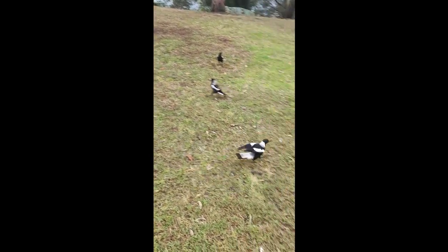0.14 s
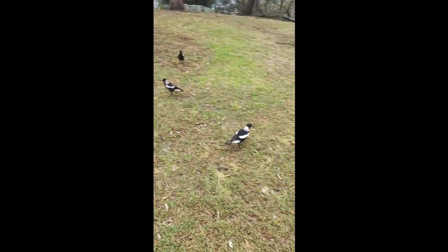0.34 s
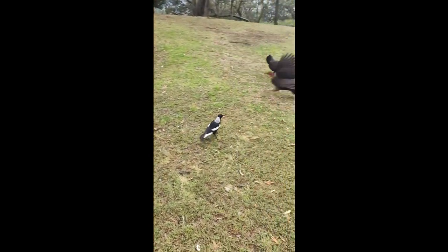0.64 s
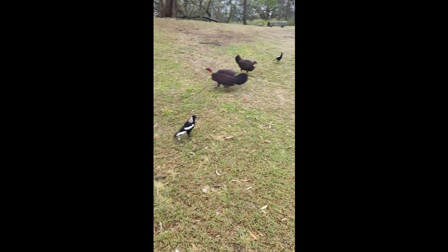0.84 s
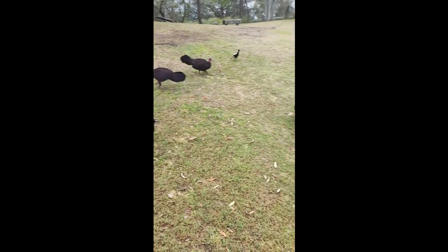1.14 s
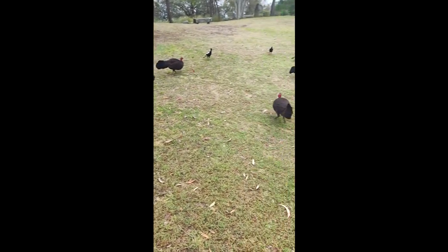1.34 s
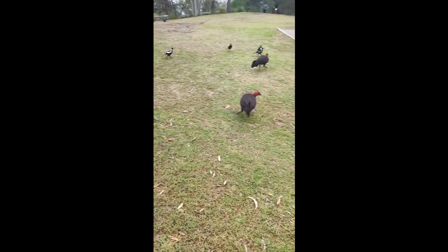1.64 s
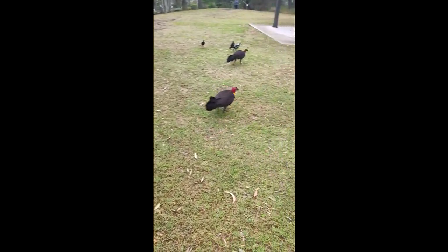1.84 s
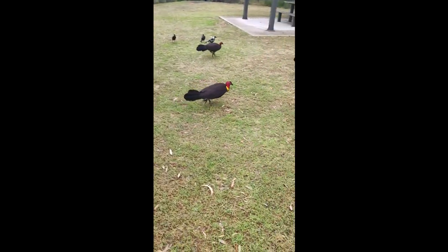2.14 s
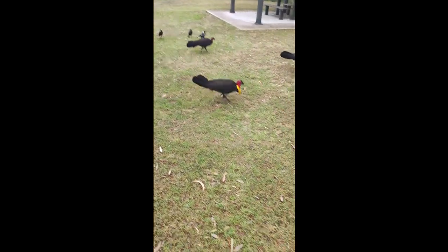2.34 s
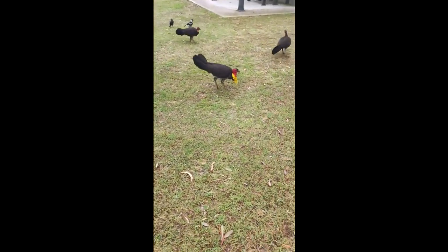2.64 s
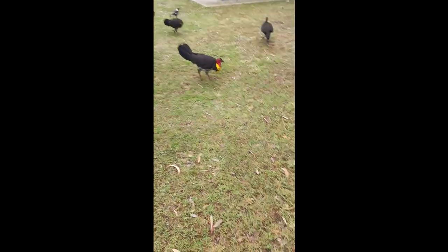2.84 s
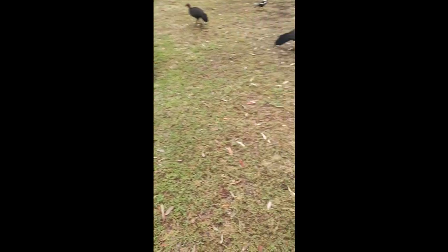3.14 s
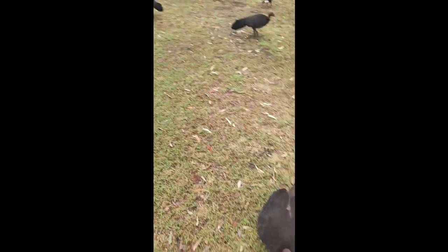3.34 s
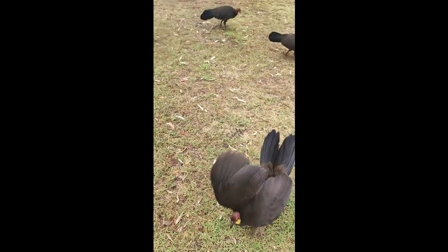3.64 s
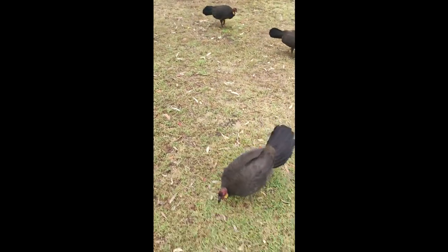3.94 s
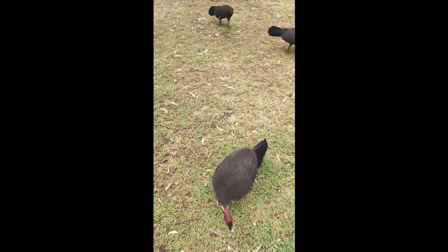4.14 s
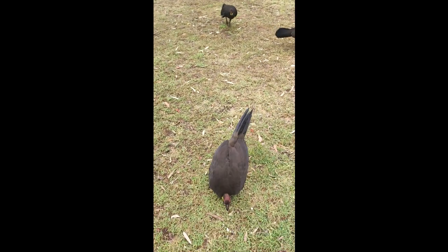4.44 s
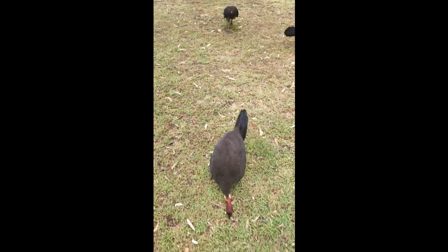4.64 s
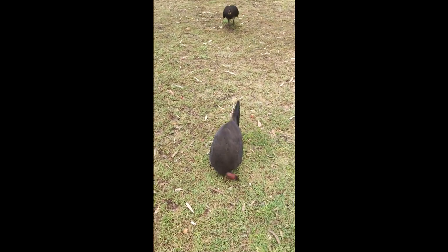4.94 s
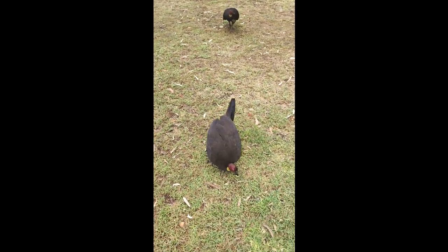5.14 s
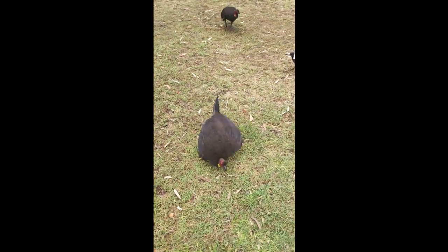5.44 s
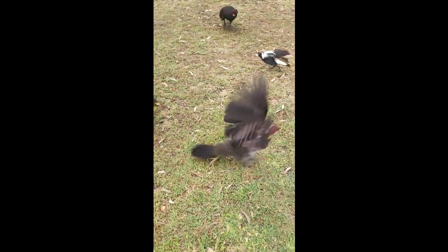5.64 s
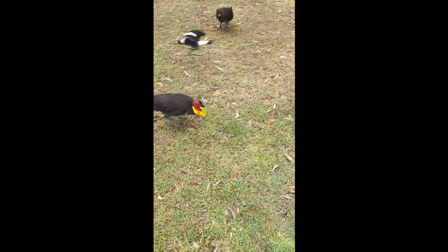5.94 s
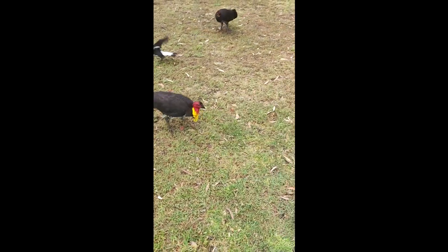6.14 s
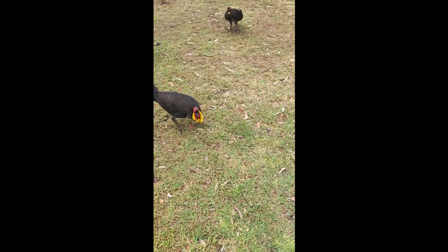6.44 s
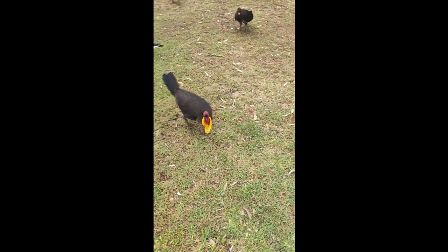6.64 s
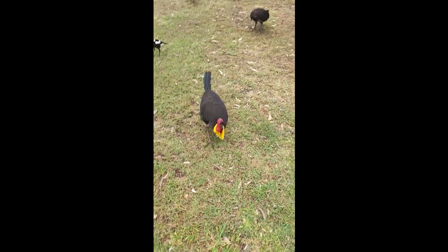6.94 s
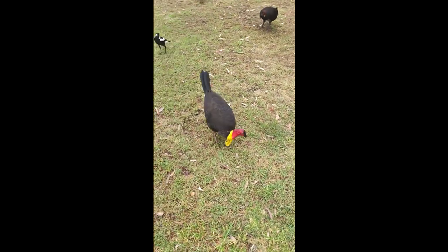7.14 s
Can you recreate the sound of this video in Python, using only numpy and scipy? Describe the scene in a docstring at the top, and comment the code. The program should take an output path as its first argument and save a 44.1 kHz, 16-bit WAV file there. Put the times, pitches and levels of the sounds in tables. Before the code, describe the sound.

A bird's downward whistle sounds four times in a park, among bursts of beating wings and rustling, snapping dry grass.

```python
"""A bird's falling whistle opens the scene and comes four times in all, echoing off the trees of a park.
Large ground birds scuffle and beat their wings on dry grass: feathers and blades crackle as they brush,
each wing stroke moves a puff of air, and stalks, claws and quills snap.
Far traffic, an engine drone and a breeze lie below. A hand-held phone listens through two
microphone openings (ports), each with its own tone colour."""
import sys
import numpy as np
from scipy import signal
from scipy.io import wavfile
from scipy.ndimage import map_coordinates

SR = 44100
rng = np.random.default_rng(int(sys.argv[2]) if len(sys.argv) > 2 else 0)


def put_to_file(sound):
    """Save the sound as 16-bit audio at rate SR, in the file named by the first command-line argument."""
    columns = np.atleast_2d(sound).T  # one column per channel
    safe = np.clip(columns, -1, 1)
    whole_steps = np.round(safe * 32767)
    wavfile.write(sys.argv[1], SR, whole_steps.astype(np.int16))


N = 321930

# Far traffic and leaves. Each row: frequency in Hz, relative level in dB.
PARK_SPECTRUM = [(25, -4.5), (85, 1), (130, -4), (400, -17.5), (900, -23.5), (2100, -33.5), (4000, -33),
                 (8400, -64), (12000, -37.5), (16500, -48)]
# How alike the park sounds at both ports. Each row: frequency in Hz, likeness (1 is the same).
PORT_LIKENESS = [(60, 0.95), (290, 1), (640, 0.32), (1400, 0.023), (3100, 0.045), (8000, 0.11), (15000, 1)]
# The engine's swell. Each row: time in seconds, level in dB.
ENGINE_LEVEL = [(0.0, -48), (.7, -45.5), (1.02, -56), (1.2, -45.5), (1.5, -51), (2.7, -41.5), (4.2, -43.5),
                (4.9, -52), (5.96, -50), (7.3, -44)]
# The engine's tones. Each row: pitch in Hz, speed of its wobble in Hz, relative level in dB.
ENGINE_TONES = [(74.6, 1.6, -1), (150.7, 4.1, -14.5), (221, 45, -16.5)]
# Heavy wing strokes push air on the ports.
# Each row: middle in seconds, level in dB, top of the noise in Hz, fade time each way in seconds.
WING_THUMPS = [(0.227, -34.5, 464, 0.013), (2.795, -35, 600, 0.005), (3.465, -43.5, 60, 0.13),
               (3.683, -42.5, 49, 0.19), (4.011, -38.5, 124, 0.023), (4.162, -40.5, 120, 0.038),
               (5.634, -34, 210, 0.022), (5.746, -32, 305, 0.032)]

# One list per whistle. Each row: time in seconds, pitch in Hz, level on the left in dB.
WHISTLE_CURVES = [
    [(0.0, 1821, -27), (0.08, 1749, -23), (0.12, 1718, -21.5), (0.17, 1670, -25), (0.235, 1612, -23),
     (0.29, 1573, -24), (0.315, 1527, -34), (0.335, 1536, -88)],
    [(1.715, 1830, -57), (1.78, 1799, -40.5), (1.91, 1740, -25.5), (2.05, 1650, -23.5), (2.1, 1588, -27.5),
     (2.165, 1533, -26.5), (2.2, 1420, -42)],
    [(4.47, 1890, -41.5), (4.56, 1906, -41), (4.63, 1806, -28), (4.76, 1696, -24.5), (4.85, 1604, -23),
     (4.87, 1555, -29.5), (4.9, 1510, -55)],
    [(6.53, 1880, -57), (6.57, 1860, -44), (6.655, 1857, -38.5), (6.7, 1810, -33), (6.74, 1756, -29.5),
     (6.82, 1716, -28), (6.88, 1667, -26.5), (6.94, 1587, -27.5), (6.96, 1540, -45), (6.98, 1540, -49)],
]
# The head turns during a whistle. Each row, in even steps from its start to its end:
# first half, left minus right in dB; second half, how far the left wave leads in radians.
HEAD_TURNS = [(-2, -5, -3, -5.5, -1, 4, -7, 1, 1.5, 0.8, 0.9, 1.1, 0.8, -0.5),
              (-3, -8.5, 0, -2.5, -3, -5, 6, -1, 1.5, -0.1, -0.5, -1.3, 0, -2.5),
              (8, 8, 5.5, 3, 4, 5, 5, 2.5, 2, 2.8, 2.9, 3.1, 3.1, 2.8, 3.1, 3.25, 3.6, 3.6),
              (4, 1, -0.5, 3, 3.5, 3, 3, 3.5, 4, 4, 4, 4.5, 4, 5)]
# Each row is a whistle: level flutter in dB, echo boost in dB (more when the bird faces away).
FLUTTER_AND_ECHO = [(0.16, 0), (0.6, -6), (1.0, 0), (0.8, 2.5)]
# Throat and beak colour the overtones. Each row: frequency in Hz, dB over the main tone.
THROAT_COLOUR = [(3100, -24), (3500, -6.5), (3800, 8), (4600, -5), (4900, -0.5), (5350, -5.5), (5700, -35),
                 (6300, -27), (6800, -19.5), (7300, -15.5), (7800, -22.5), (8600, -3.5), (9100, -14.5),
                 (9500, -56), (10200, -28.5), (11000, -28.5), (13000, -34)]
# Each row is a whistle: dB added to the throat's colour for the overtones at 2 to 7 times the pitch.
OVERTONE_BOOSTS = [(-3, 0.5, 7.5, 0, 14.5, -2), (-1.5, -1.5, 1.5, -5, 13, -11),
                   (-13.5, -14.5, 4, -8.5, 2, -27), (0, -3.5, 6, -2, 14, -27)]
# Each row is a whistle: left minus right in dB for overtones 2 to 6.
OVERTONE_SIDES = [(2.5, 9.6, 8.3, 10, 16), (12, 6.8, 5.8, 11, 7.9), (1, 2.7, 12, 6.1, 1),
                  (9, 6.3, 12, 16, 9)]
# Each row is a whistle: how far the left wave leads in radians for overtones 2 and 3.
OVERTONE_LEADS = [(-2.7, -.9), (-3.0, 1.0), (-.2, -2.8), (.9, -1.3)]
# One list per soft note near the whistles. Each row: time in seconds, pitch in Hz, level in dB.
SOFT_NOTE_CURVES = [
    [(1.65, 1560, -58), (1.705, 1508, -35), (1.745, 1507, -39), (1.77, 1600, -54)],
    [(1.74, 1750, -41), (1.77, 1677, -42), (1.9, 1630, -61)],
    [(4.44, 1610, -59), (4.525, 1530, -58)],
    [(6.48, 1660, -74), (6.52, 1600, -60), (6.565, 1490, -54), (6.585, 1520, -58)],
    [(6.56, 2010, -66), (6.62, 1975, -55), (6.7, 1930, -63)],
]

# Where the scuffle is. Each row: time in seconds, left delay in milliseconds,
# left minus right in dB, sheen above 9 kHz in dB (more when near).
SCUFFLE_PLACE = [(0, 0.052, -2.5, 10), (.5, 0.082, 3.5, 0.5), (1.2, 0.36, -3, -2), (1.9, 0.2, -1.5, -8),
                 (2.2, 0.23, -2.5, 2.5), (2.5, 0.22, -3, 2.5), (3.001, 0.17, 0, -8.5),
                 (3.5, 0.092, -0.5, -6), (4.6, -0.078, -0.5, -9), (5.2, 0.38, -6.5, -13),
                 (5.5, 0.14, -3, 1), (5.7, -0.13, 1, 4), (6.101, 0.0094, 2, 2.5), (7.3, -0.021, 2, -11)]
# Stalks, claws and quills. Each row: start in seconds, bright peak in dB, dull part over that in dB.
SNAP_EVENTS = [(0.318, -30, -2), (0.3805, -26, -7), (0.4796, -25, -4), (0.5786, -41, 10), (0.996, -43, 9),
               (1.0104, -31, -5), (1.02, -42.5, 10), (1.036, -42, 6), (1.082, -46, 14), (1.1374, -38, -2),
               (1.1496, -27, -6), (1.1912, -25, -12), (1.213, -33, -10), (1.2193, -19, -14),
               (1.2304, -25, -7), (1.24, -27, 3), (1.259, -20, -13), (1.281, -24, -8), (1.298, -18.5, -21),
               (1.308, -23, -10), (1.326, -25, -8), (1.3513, -29, -9), (1.415, -23, -2),
               (1.4371, -26.5, -10), (1.452, -37, 5), (1.479, -50, 18), (1.5342, -47.5, 13),
               (1.645, -28, -12), (1.659, -22, -5), (1.667, -14.5, -20), (1.698, -25.5, -2),
               (1.72, -48, 16), (2.078, -17, 0), (2.143, -21, -11), (2.4735, -9, -9), (2.6535, -7.5, -20),
               (2.7274, -14, -14), (3.016, -30, -9), (3.172, -32, -3), (3.3365, -26, 2), (3.489, -19, -4),
               (3.636, -30, -5), (3.6563, -17.5, -2), (3.786, -14, -6), (3.854, -31, -16),
               (3.8716, -16.5, -2), (3.95, -22, -8.5), (4, -15.5, -4), (4.1, -19, -8), (4.117, -10, -13),
               (4.136, -18, -1), (4.1558, -13.5, 0.5), (4.251, -21, -10), (4.268, -23, 1.5),
               (4.3364, -24, 11.5), (4.338, -11.5, -7.5), (4.3502, -19.5, 2), (4.403, -27, 2),
               (4.407, -21, -11), (4.427, -20, -17), (4.431, -20, -20), (4.547, -19.5, -5.5),
               (4.609, -23, -1), (4.6884, -28, -19), (4.706, -40, 9), (4.859, -39, 0), (4.942, -27, -19),
               (4.999, -42, 9), (5.027, -26, 0.5), (5.107, -40, 11), (5.1917, -32, 10), (5.268, -19.5, -7),
               (5.3191, -17, -15), (5.396, -22, 1.5), (5.45, -37, 3), (5.482, -37, 4.5), (5.536, -24, -11),
               (5.5605, -28, 0), (6.03, -25, -14), (6.039, -19, -15), (6.3232, -27, -6), (6.641, -26, -5),
               (6.668, -24, -15), (7.071, -43, 3)]
# Wing strokes and steps in the grass. Each row: peak time, rise and fall in seconds,
# hiss level in dB, body over hiss in dB, level of the air puff in dB.
WINGS_AND_STEPS = [(0.218, 0.049, 0.053, -35, -16, -44.5), (0.333, 0.043, 0.026, -33.5, -17, -43.5),
                   (0.399, 0.029, 0.021, -29, -16.5, -41.5), (0.503, 0.016, 0.035, -47, -17, -57),
                   (0.582, 0.017, 0.031, -46.5, -13, -67), (0.637, 0.041, 0.07, -46.5, -20, -64),
                   (0.864, 0.1, 0.019, -46.5, -20, -68), (0.919, 0.034, 0.035, -51, -29, -69),
                   (1.013, 0.021, 0.046, -54.5, -8, -63), (1.235, 0.015, 0.028, -37.5, -13, -49),
                   (1.3, 0.011, 0.017, -30.5, -19.5, -50), (1.665, 0.089, 0.0084, -43.5, -20, -67.0),
                   (1.881, 0.081, 0.046, -34.5, -20.5, -67), (1.975, 0.039, 0.0098, -35.0, -24, -56),
                   (2.093, 0.033, 0.052, -23, -14.5, -39), (2.154, 0.011, 0.043, -19, -15, -32.5),
                   (2.271, 0.032, 0.046, -23.5, -14.5, -41), (2.325, 0.021, 0.039, -19, -14.5, -33.5),
                   (2.438, 0.072, 0.077, -30.5, -14, -43.5), (2.473, 0.0026, 0.051, -24, -11.5, -37.5),
                   (2.646, 0.0047, 0.03, -27.5, -15, -51), (2.789, 0.061, 0.063, -18.5, -18, -39.5),
                   (2.877, 0.011, 0.4, -25.5, -17, -45), (3.032, 0.01, 0.24, -33.5, -15, -48.5),
                   (3.11, 0.015, 0.019, -35, -10, -54), (3.196, 0.013, 0.17, -30, -15, -48.5),
                   (3.513, 0.021, 0.0075, -29, -14.5, -45), (3.654, 0.014, 0.13, -29.5, -13, -45),
                   (3.852, 0.098, 0.038, -26, -16, -44), (3.892, 0.007, 0.016, -27, -21, -49),
                   (3.961, 0.025, 0.039, -28.5, -16.5, -46.0), (4.0, 0.0086, 0.054, -26.5, -10, -38),
                   (4.109, 0.016, 0.046, -24, -15.5, -39), (4.153, 0.005, 0.054, -22.5, -15.5, -40.5),
                   (4.281, 0.027, 0.026, -29.5, -15.5, -45.5), (4.352, 0.004, 0.0071, -38, -17, -45),
                   (4.374, 0.15, 0.006, -38, -9.5, -50), (4.499, 0.069, 0.035, -31, -13, -49),
                   (4.554, 0.0045, 0.006, -27.5, -21, -44), (4.798, 0.015, 0.06, -40, -16, -66),
                   (4.967, 0.13, 0.096, -45, -15, -60), (5.285, 0.084, 0.012, -35.5, -12.5, -50),
                   (5.323, 0.015, 0.065, -41, -11, -46), (5.651, 0.055, 0.026, -32.5, -14.5, -41),
                   (5.688, 0.019, 0.022, -27, -15.5, -37), (5.749, 0.046, 0.06, -29.5, -14, -40),
                   (5.829, 0.021, 0.03, -29.5, -17.5, -41.5), (5.915, 0.011, 0.039, -44, -24, -49),
                   (6.052, 0.021, 0.051, -30, -17.5, -48.5), (6.166, 0.037, 0.065, -41, -15.5, -58),
                   (6.333, 0.012, 0.0073, -38.5, -16.5, -52.0), (6.565, 0.028, 0.033, -43.5, -23, -67.0),
                   (6.676, 0.037, 0.01, -37.5, -20, -57)]
# Small movements between strokes. Each row: time in seconds, hiss level in dB.
FIDGET_LEVEL = [(0, -61), (.45, -40.5), (.7, -60), (1.05, -52), (1.3, -49.5), (1.55, -60), (1.75, -44.5),
                (2.03, -46), (2.2, -34.5), (2.6, -32.5), (2.9, -81), (3.35, -30.5), (4.2, -34.5),
                (4.6, -37.5), (4.9, -58), (5.5, -48), (5.9, -41.5), (6.25, -49), (6.45, -51.5), (7.3, -55)]
# The rustle's high part, its hiss. Each row: frequency in Hz, relative level in dB.
HISS_SPECTRUM = [(4500, -9), (6000, 3.5), (8500, 14.5), (10500, 6), (12500, -1), (14500, -4.5),
                 (17500, 3.5)]
# The rustle's middle part, its body. Each row: frequency in Hz, relative level in dB.
BODY_SPECTRUM = [(480, -47), (750, 5.5), (1100, -6), (2200, 7.5), (3500, 4), (5500, 4), (7000, -4.5)]
# Air cupped under the wing. Each row: centre in Hz, width in Hz, boost in dB.
WING_HOLLOW = [(282, 105, 3.5), (974, 210, 2)]

# The tone colour of each port. Each row: centre in Hz, width in Hz, boost or cut in dB.
LEFT_COLOUR = [(8050, 1400, 12)]
RIGHT_COLOUR = [(1750, 1100, 5), (7300, 1400, -6), (9100, 1400, 7)]


def from_db(db):
    """Turn decibels into a number to multiply by."""
    return 10 ** (np.asarray(db) / 20)


def rms_one(x):
    """Scale a sound so that its average strength (rms) is 1."""
    return x / np.sqrt(np.mean(x ** 2) + 1e-20)


def in_time(rows):
    """Join a table's timed rows with straight lines, giving one curve per value column."""
    times, *columns = np.transpose(rows)
    return [np.interp(np.arange(N) / SR, times, column) for column in columns]


def at_hz(points, hz):
    """Look up a table at a frequency, with octaves evenly spaced."""
    frequencies, values = np.transpose(points)
    return np.interp(np.log(hz), np.log(frequencies), values)


def band(x, low_hz, high_hz):
    """Keep the sound between two frequencies."""
    sos = signal.butter(2, [low_hz, min(high_hz, .45 * SR)], "band", fs=SR, output="sos")
    return signal.sosfilt(sos, x)


def drift(rate_hz):
    """A smooth random wobble of size about 1; a higher rate wobbles faster."""
    pole = np.exp(-20 * np.pi * rate_hz / SR)
    noise = rng.standard_normal(N // 10 + 4002)
    slow = signal.lfilter([1], [1, -2 * pole, pole * pole], noise)[4000:]
    return np.interp(np.arange(N) / 10, np.arange(len(slow)), rms_one(slow))


def resonate(x, peaks):
    """Boost or cut the sound around each listed frequency."""
    for hz, width, gain_db in peaks:
        gain, angle = from_db(gain_db / 2), 2 * np.pi * hz / SR
        spread = np.sin(angle) * width / hz / 2
        x = signal.lfilter([1 + spread * gain, -2 * np.cos(angle), 1 - spread * gain],
                           [1 + spread / gain, -2 * np.cos(angle), 1 - spread / gain], x)
    return x


def park(level_db=-47):
    """Far traffic and leaves: smooth noise, alike at both ports in the bass."""
    out, edges = 0, 20 * 2 ** np.arange(0, 10, .5)
    white = rng.standard_normal((2, 2, N))
    for k, (low, high) in enumerate(zip(edges, edges[1:])):
        mid, side = band(white[k % 2], low, high)
        hz = np.sqrt(low * high)
        alike = at_hz(PORT_LIKENESS, hz)
        gain = from_db(at_hz(PARK_SPECTRUM, hz) + 0.7 * drift(8.5))
        out = out + gain * (np.sqrt(1 + alike) * mid + np.sqrt(1 - alike) * side * [[1], [-1]])
    return from_db(level_db) * rms_one(out)


def engine():
    """A far engine: three low tones, blurred by its uneven speed."""
    level_db, = in_time(ENGINE_LEVEL)
    t = np.arange(N) / SR
    tones = 0
    for hz, wobble_hz, tone_db in ENGINE_TONES:
        gain = from_db(tone_db + 0.24 * drift(wobble_hz))
        tones += gain * np.sin(2 * np.pi * hz * t + 1.04 * drift(wobble_hz))
    return np.sqrt(2) * from_db(level_db) * tones


def air_on_ports(breeze_db=-53.5):
    """The breeze makes a lumpy rumble, and each heavy wing stroke a dull thump."""
    shared, left, right = rng.standard_normal((3, N))
    wind = shared + .85 * np.array([left, right])
    out = from_db(breeze_db + 2.1 * drift(4.5)) * rms_one(band(wind, 9.2, 39))
    t = np.arange(N) / SR
    for middle, level_db, top_hz, fade in WING_THUMPS:
        swing = 1.43 * np.sin(2 * np.pi * 24 * (t - middle))   # suction, then push
        swell = from_db(level_db) * np.exp(-((t - middle) / fade) ** 2)
        out += swell * (rms_one(band(wind, 39, top_hz)) + swing)
    return out * from_db([[-1.5], [1.5]])


def note_gate(rows, fade_s=0.008):
    """Fade a note in and out; one at the very start is already on."""
    t = np.arange(N) / SR
    start, end = rows[0][0], rows[-1][0]
    return np.clip(np.minimum(t - start + (start < .01), end - t) / fade_s, 0, 1)


def soft_notes():
    """Short, quiet tones with a shaky pitch, a little to the left."""
    out = 0
    for rows in SOFT_NOTE_CURVES:
        hz, level_db = in_time(rows)
        phase = 2 * np.pi * np.cumsum(hz * (1 + .012 * drift(90))) / SR
        out += np.sqrt(2) * note_gate(rows) * from_db(level_db) * np.sin(phase)
    return out * from_db([[1.5], [-1.5]])


def whistle(index, flutter_db, hoarse_per_db=.001, effort=0.54):
    """One wavering, nearly pure tone: brighter when loud, hoarser when quiet."""
    rows = WHISTLE_CURVES[index]
    start, end = rows[0][0], rows[-1][0]
    span = slice(int(start * SR), int(end * SR))
    hz, level_db = np.array(in_time(rows))[:, span]
    quieter_db = level_db.max() - level_db
    turn = np.reshape(HEAD_TURNS[index], (2, -1)).T
    turn_times = np.linspace(start, end, len(turn))
    pan_db, lead = np.array(in_time(np.c_[turn_times, turn]))[:, span]
    waver = 1 + 0.00116 * drift(46)[span] + hoarse_per_db * quieter_db * drift(156)[span]
    phase = 2 * np.pi * np.cumsum(hz * waver) / SR
    right = from_db(-pan_db) * np.sin(phase - lead - 0.06 * drift(13)[span])
    tone = np.array([np.sin(phase), right])
    overtones = zip(OVERTONE_BOOSTS[index], [*OVERTONE_SIDES[index], 0],
                    [*OVERTONE_LEADS[index], 0, 0, 0, 0])
    for multiple, (boost_db, side_db, left_lead) in enumerate(overtones, start=2):
        over_db = boost_db + at_hz(THROAT_COLOUR, multiple * hz) + 2.0 * drift(48)[span]
        over_db -= effort * np.sqrt(multiple - 1) * quieter_db   # higher ones fade faster
        offset = rng.uniform(0, 2 * np.pi) - np.array([[0], [left_lead]])
        tone += from_db([over_db, over_db - side_db]) * np.sin(multiple * phase + offset)
    flutter = flutter_db * np.array([drift(30)[span], drift(30)[span]])
    out = np.zeros((2, N))
    out[:, span] = np.sqrt(2) * note_gate(rows)[span] * from_db(level_db + flutter) * tone
    return out


def tree_echoes(sound, first_s=0.025, fade_60db_s=0.43, gain_db=-37, echoes_per_s=1200):
    """Tree trunks scatter the sound back as many faint, dying echoes."""
    t = np.arange(SR // 2) / SR
    arrives = (rng.random((2, len(t))) < echoes_per_s / SR) & (t > first_s)
    fade = from_db(gain_db) * 1000.0 ** (-(t - first_s) / fade_60db_s)
    echoes = arrives * rng.standard_normal((2, len(t))) * fade
    return signal.fftconvolve(band(sound, 640, 8400), echoes, axes=1)[:, :N]


def whistling_bird():
    """Four whistles, answered by the trees, with soft notes near them."""
    direct, to_trees = np.zeros((2, 2, N))
    for index, (flutter_db, echo_db) in enumerate(FLUTTER_AND_ECHO):
        tone = whistle(index, flutter_db)
        direct += tone
        to_trees += from_db(echo_db) * tone
    return direct + soft_notes() + tree_echoes(to_trees)


def snaps(crack_s=.00045, tail_s=0.0034, tail_share=0.08):
    """Stalks, claws and quills snap: tiny bursts of noise, each with a bright and a dull part."""
    out = np.zeros((2, N))
    t = np.arange(700) / SR
    shape = t / crack_s * np.exp(1 - t / crack_s) + tail_share * np.exp(-t / tail_s)
    times, lags_ms, pans_db, _ = np.transpose(SCUFFLE_PLACE)
    for start, peak_db, dull_db in SNAP_EVENTS:
        lag_ms, pan_db = np.interp(start, times, lags_ms), np.interp(start, times, pans_db)
        burst = rng.standard_normal(len(t)) * shape
        burst[int(crack_s * SR)] += 4.0   # the break itself is one sharp click
        bright = band(burst, 5970, 10950) + .45 * band(burst, 6500, 18000)
        dull = band(burst, 1840, 7850)
        heard = (resonate(bright, LEFT_COLOUR) + resonate(bright, RIGHT_COLOUR)) / 2
        bright = from_db(peak_db) * bright / abs(heard).max()   # allow for the ports' colour
        dull = from_db(peak_db + dull_db) * dull / abs(dull).max()
        for part, delay in (bright, 0), (dull, lag_ms / 1000):
            for side, (arrival, gain_db) in enumerate([(start + delay, pan_db / 2), (start, -pan_db / 2)]):
                i = int(arrival * SR)
                out[side, i:i + len(t)] += from_db(gain_db) * part[:N - i]
    return out


def at_ports(sounds, alike, lag_share=1):
    """Three sounds become two: the first is shared, shifted in time on the left; each port adds its own."""
    shared, own = sounds[0], sounds[1:]
    lag_samples = lag_share * in_time(SCUFFLE_PLACE)[0] * SR / 1000
    left = map_coordinates(shared, [np.arange(N) - lag_samples], order=3)
    return np.sqrt(alike) * np.array([left, shared]) + np.sqrt(1 - alike) * own


def flickering_bands(x, spectrum, slow_db=1.8, fast_db=2.4):
    """Shape a sound in third-octave bands, each with its own level and flicker."""
    lowest, highest = spectrum[0][0], spectrum[-1][0]
    edges = lowest * 2 ** np.arange(0, np.log2(highest / lowest) + .3, 1 / 3)
    out = 0
    for k, (low, high) in enumerate(zip(edges, edges[1:])):
        level_db = at_hz(spectrum, np.sqrt(low * high)) + slow_db * drift(5.9) + fast_db * drift(31.6)
        out += (-1) ** k * from_db(level_db) * band(x, low, high)   # flipped signs help the bands join
    return out


def crackle(clicks_per_s=1800.0, spread_db=2.2, hush=1.1):
    """Three streams of tiny uneven clicks that come in clumps, over a soft hush."""
    clumps = from_db(1.2 * drift(100) + .7 * drift(25))
    clicks = rng.random((3, N)) < clicks_per_s * clumps / SR
    sizes = from_db(spread_db * np.minimum(rng.exponential(1, (3, N)), 3))
    signs = rng.choice([-1, 1], (3, N))
    return clumps * (rms_one(clicks * sizes * signs) + hush * rng.standard_normal((3, N)))


def movement(edge_drop_db=7.5, air_tighter=1.63):
    """How strong hiss, body and air are: each stroke swells and fades on top of the fidgeting."""
    fidget_db, = in_time(FIDGET_LEVEL)
    fidget_air_db = -60 + 0.47 * (fidget_db + 50)   # the air swings about half as many dB as the hiss
    power = from_db([fidget_db, fidget_db - 16.5, fidget_air_db]) ** 2
    for peak, rise, fall, hiss_db, body_db, air_db in WINGS_AND_STEPS:
        span = slice(max(int((peak - .3) * SR), 0), int((peak + .3) * SR))
        from_peak = np.arange(N)[span] / SR - peak
        drop_db = edge_drop_db * (from_peak / np.where(from_peak > 0, fall, rise)) ** 2
        levels_db = [hiss_db - drop_db, hiss_db + body_db - drop_db, air_db - air_tighter * drop_db]
        power[:, span] += from_db(levels_db) ** 2
    return np.sqrt(power)


def scuffle():
    """Feathers and dry blades crackle as they brush; each wing stroke also moves a puff of air."""
    hiss_gain, body_gain, air_gain = movement()
    _, pan_db, sheen_db = in_time(SCUFFLE_PLACE)
    clicks = crackle()
    hiss = flickering_bands(at_ports(clicks, alike=0.55, lag_share=0), HISS_SPECTRUM)
    body = flickering_bands(at_ports(clicks, alike=0.25), BODY_SPECTRUM)
    hiss /= np.std(band(resonate(hiss[0], LEFT_COLOUR), 6500, 10000))   # allow for the left port's colour
    body /= np.std(band(body[0], 2000, 2950))
    sheen = signal.sosfilt(signal.butter(1, 9000, "high", fs=SR, output="sos"), hiss)
    hiss += (from_db(sheen_db) - 1) * sheen
    puff = rng.standard_normal((3, N)) * from_db(2.7 * drift(33.3))
    puff = band(puff, 154, 1330) + 1.52 * band(puff, 76, 543)   # the push of the stroke is low in pitch
    air = rms_one(at_ports(resonate(puff, WING_HOLLOW), alike=0.67))
    out = hiss_gain * hiss + body_gain * body + air_gain * air
    out[1] *= from_db(-pan_db)
    return out


def scene():
    """Add up all the sounds that reach the left and right ports."""
    return whistling_bird() + scuffle() + snaps() + park() + engine() + air_on_ports()


def record(dry):
    """Each port colours the sound, and the phone cuts the highest treble."""
    heard = np.array([resonate(dry[0], LEFT_COLOUR), resonate(dry[1], RIGHT_COLOUR)])
    return signal.sosfilt(signal.cheby2(12, 70, 16750, fs=SR, output="sos"), heard)


dry = scene()
out = record(dry)
put_to_file(out)
```